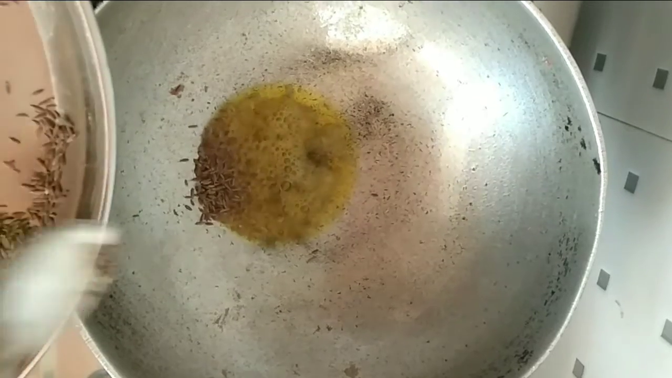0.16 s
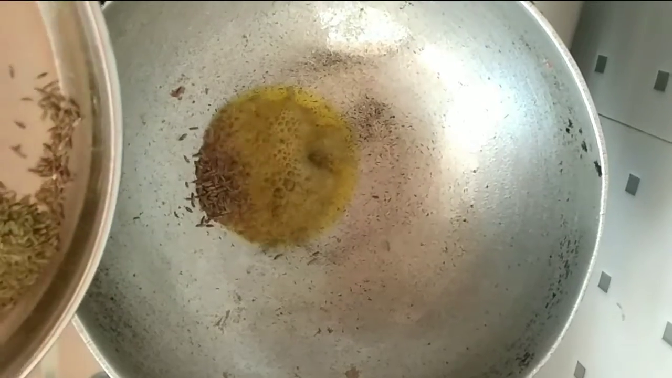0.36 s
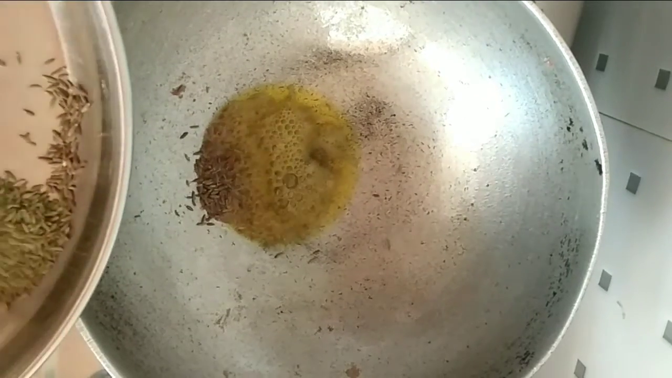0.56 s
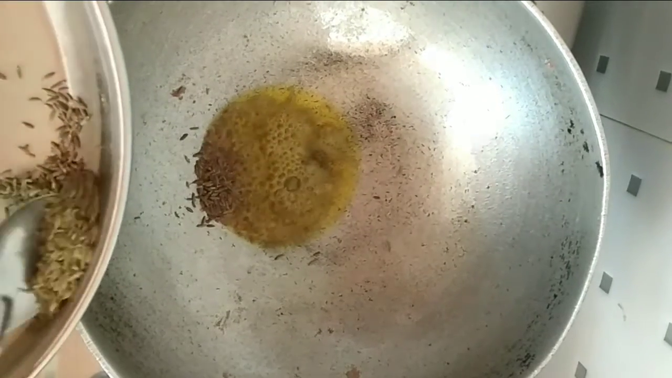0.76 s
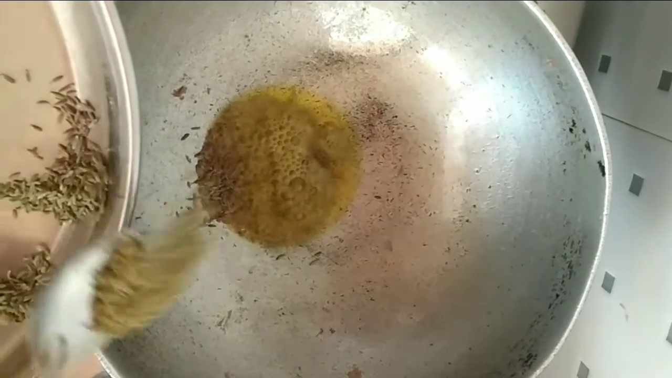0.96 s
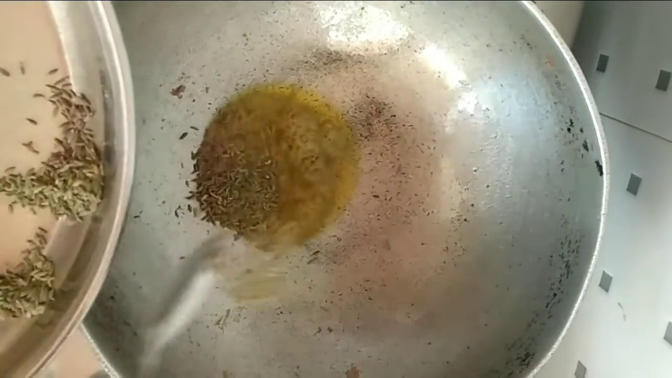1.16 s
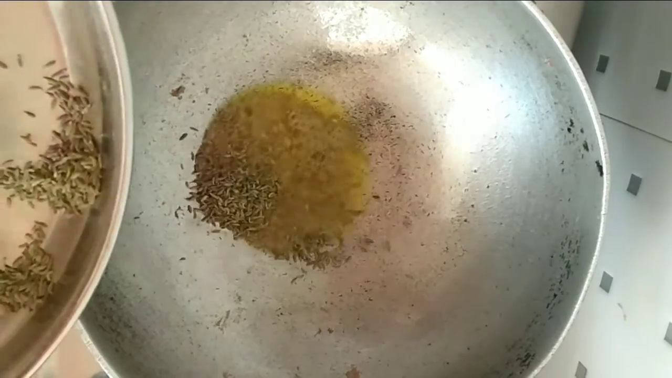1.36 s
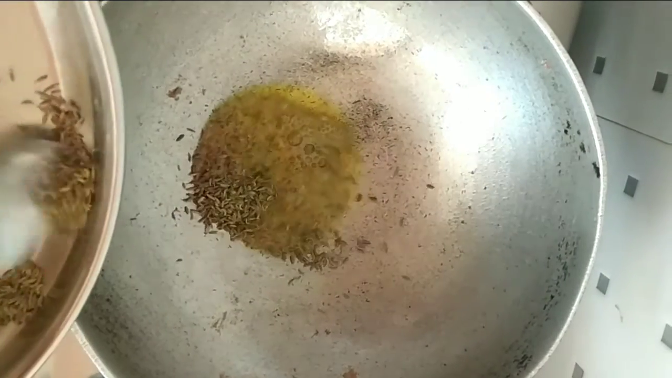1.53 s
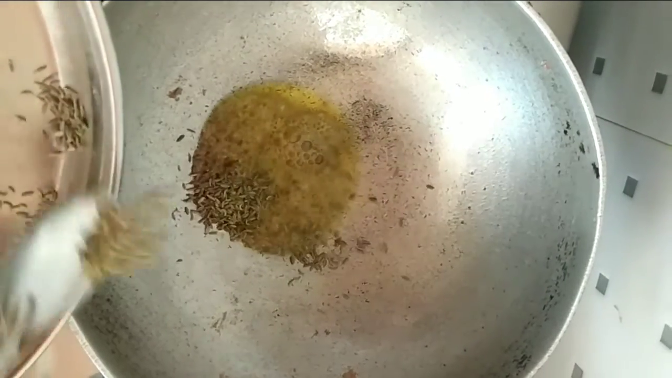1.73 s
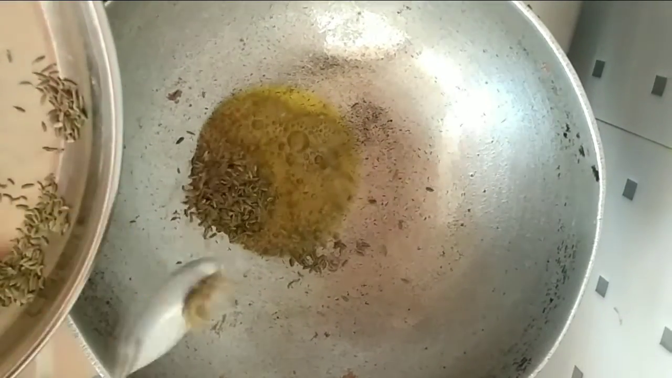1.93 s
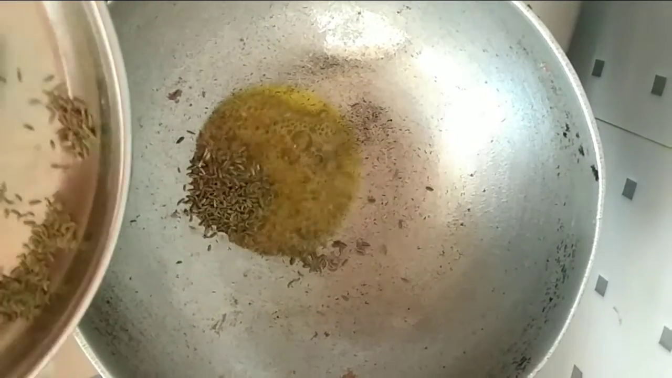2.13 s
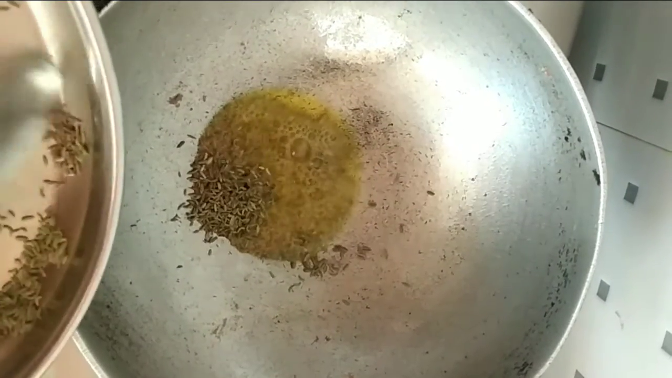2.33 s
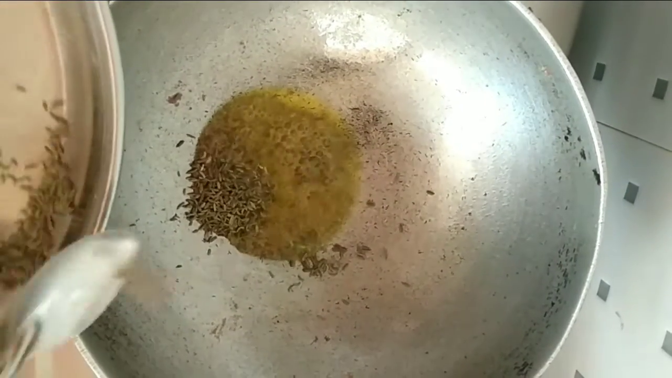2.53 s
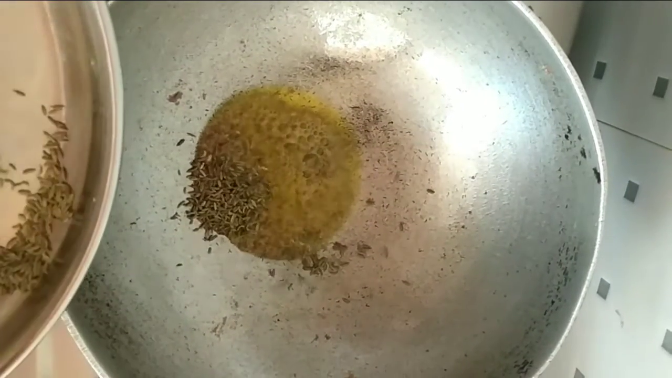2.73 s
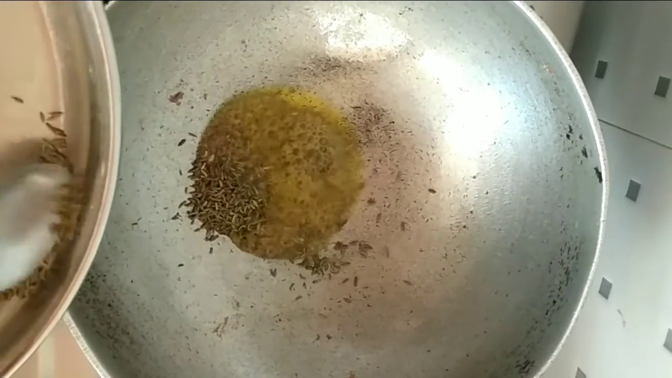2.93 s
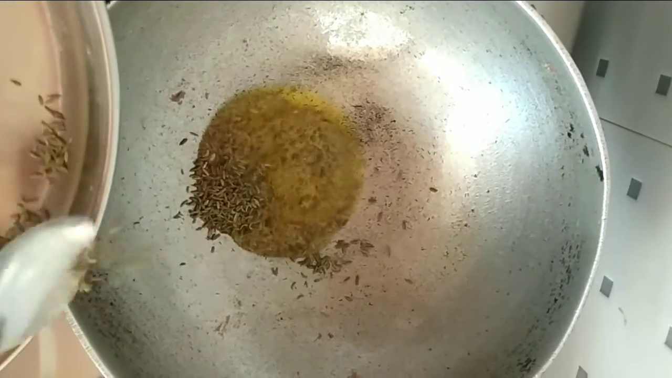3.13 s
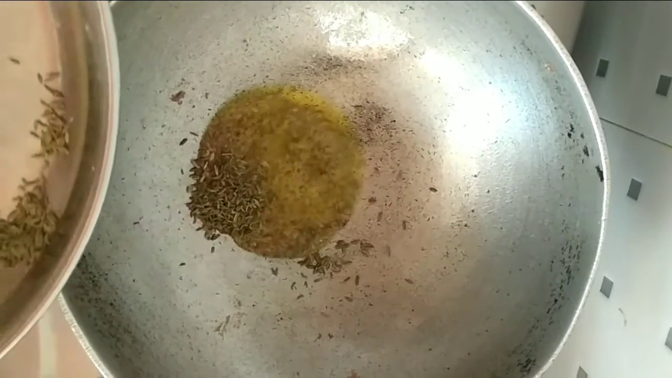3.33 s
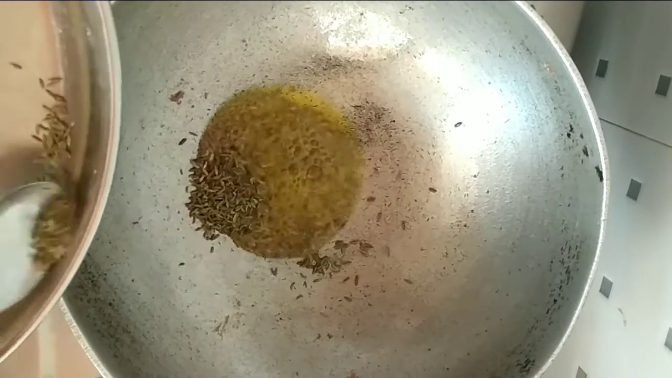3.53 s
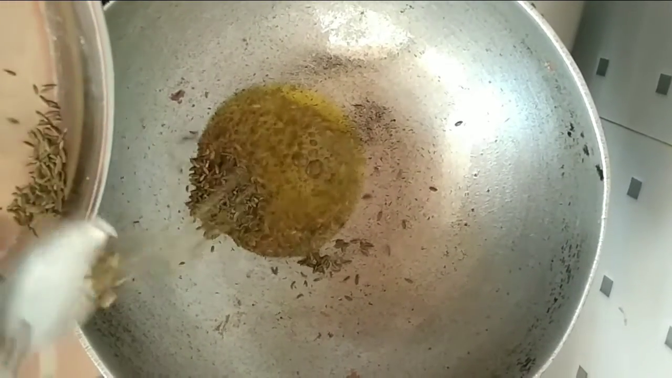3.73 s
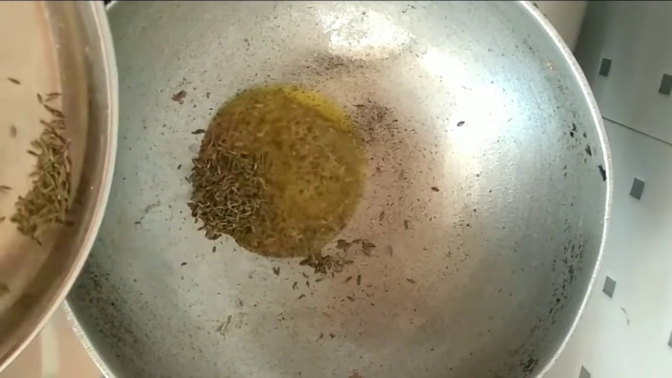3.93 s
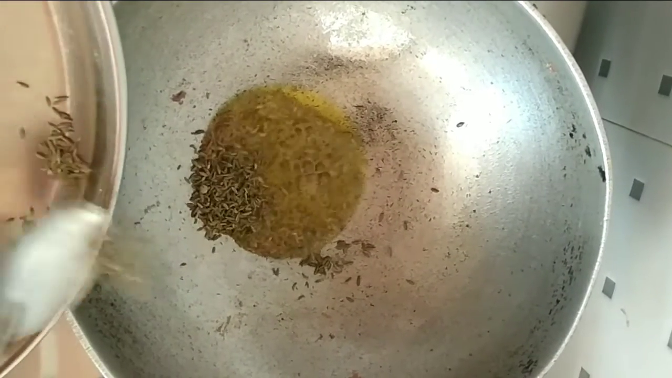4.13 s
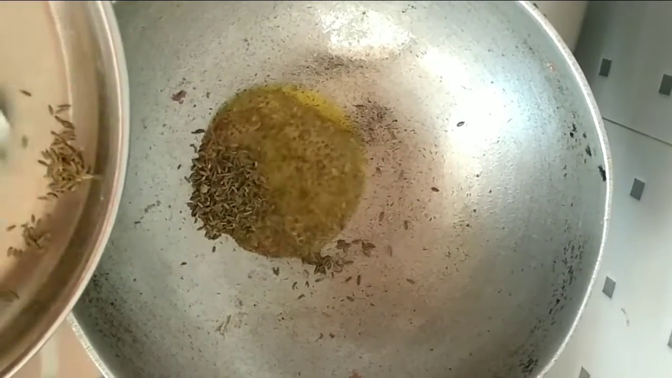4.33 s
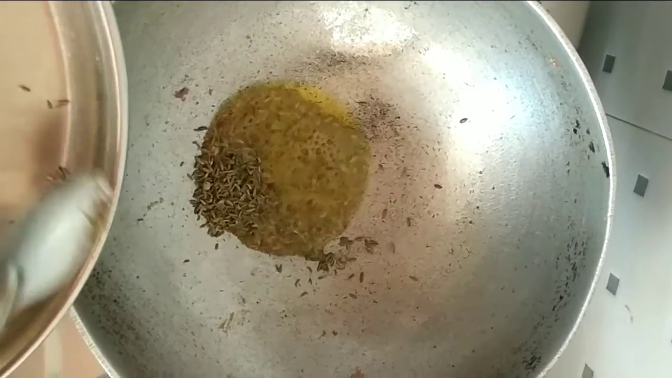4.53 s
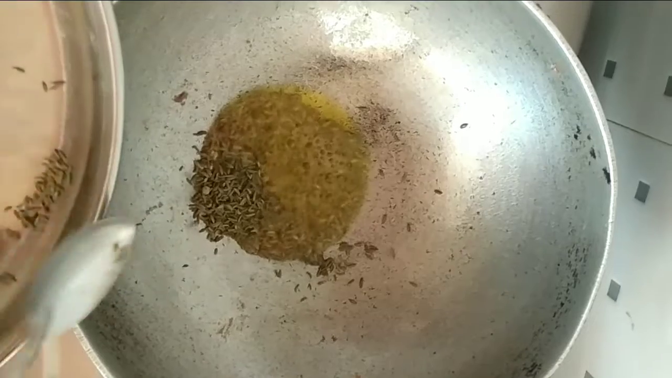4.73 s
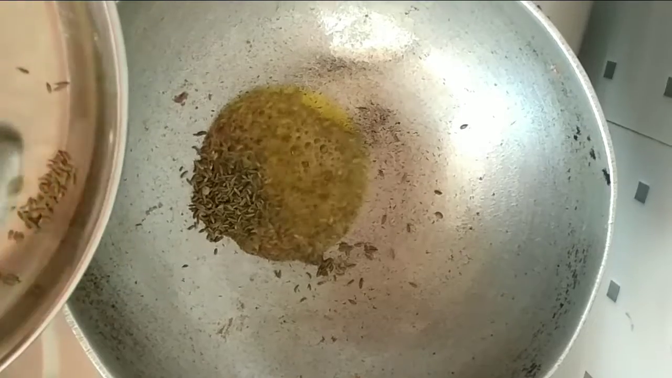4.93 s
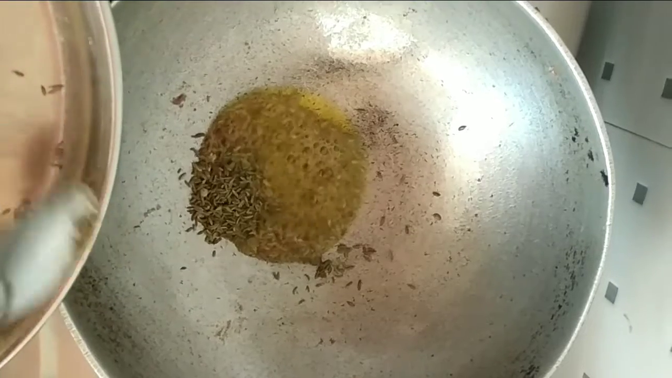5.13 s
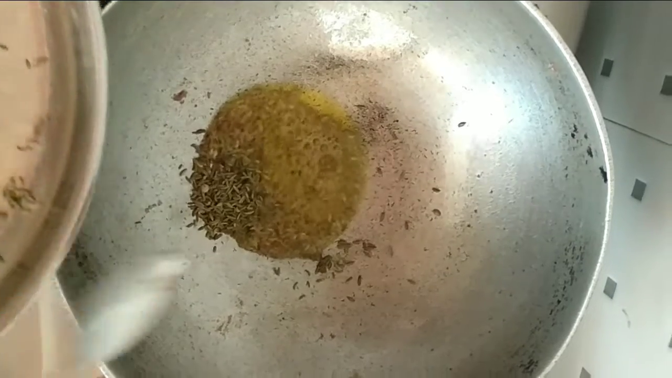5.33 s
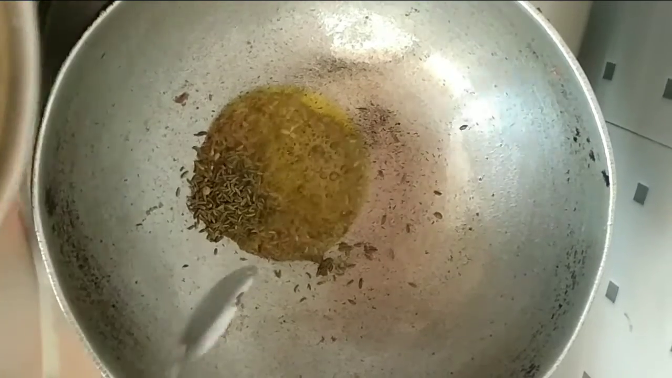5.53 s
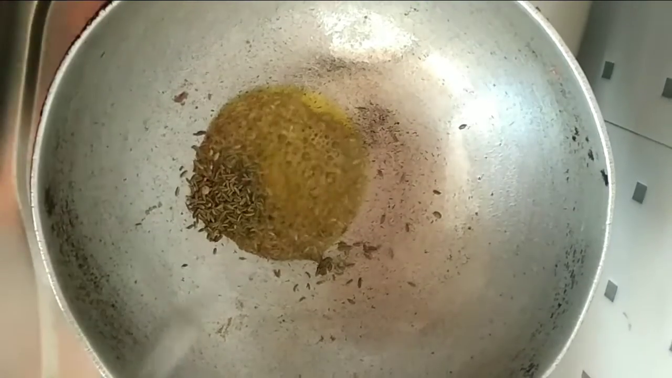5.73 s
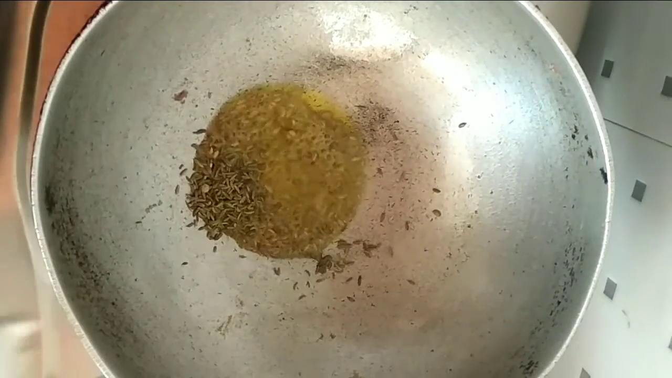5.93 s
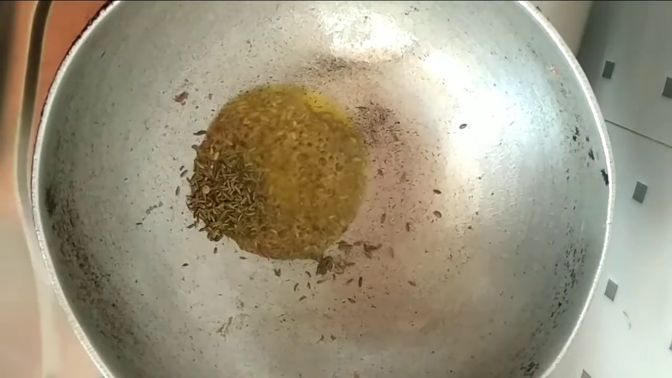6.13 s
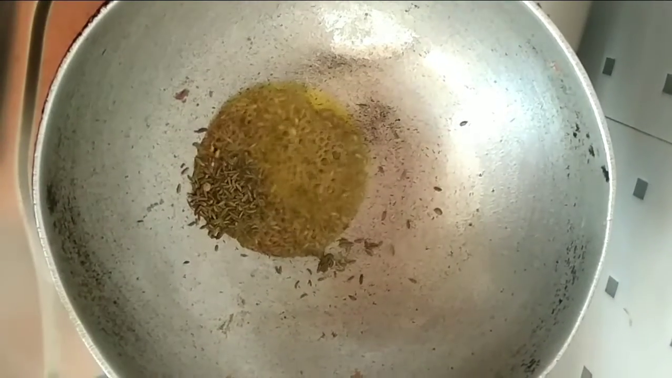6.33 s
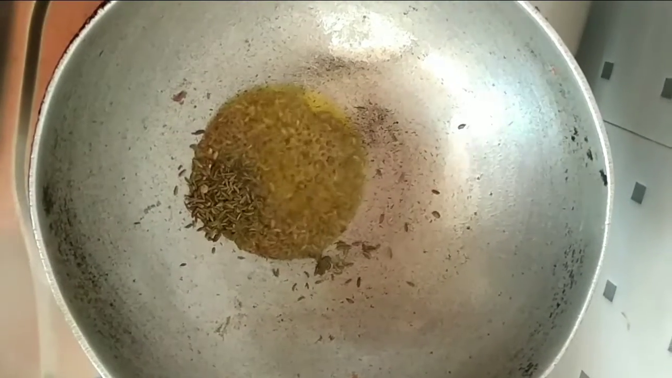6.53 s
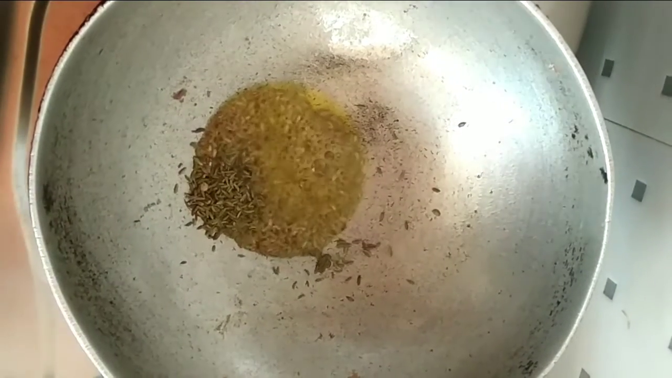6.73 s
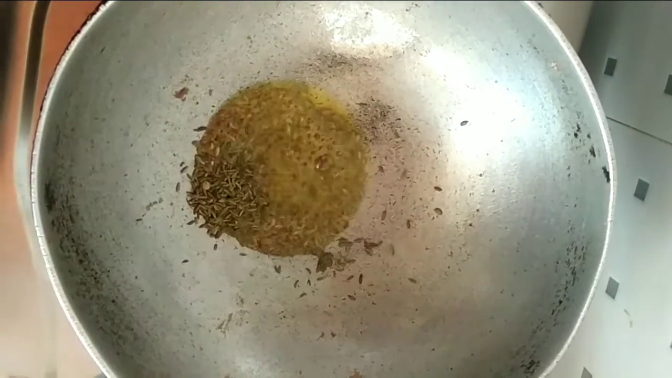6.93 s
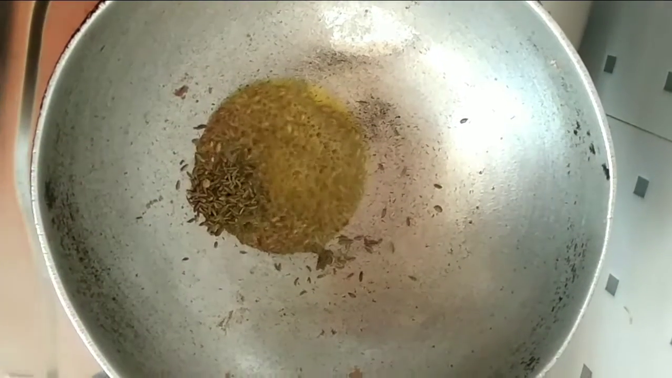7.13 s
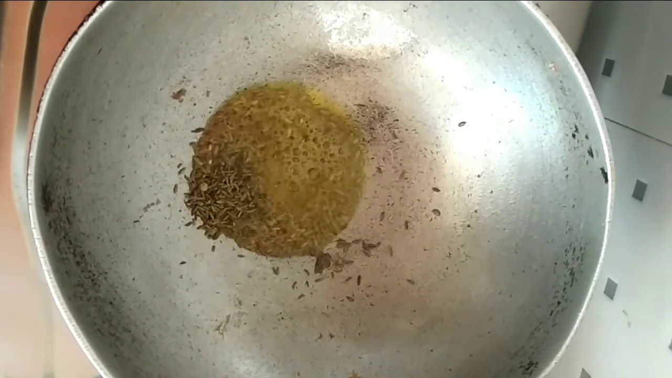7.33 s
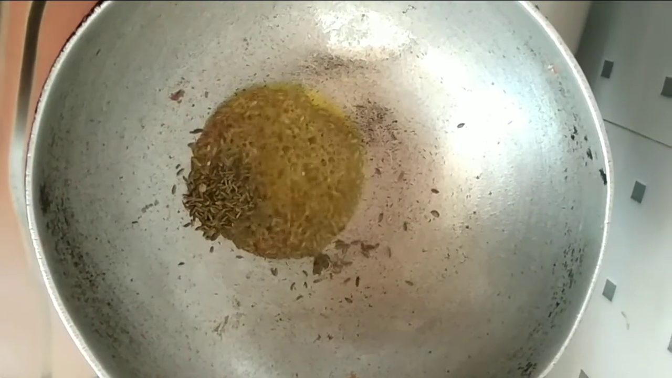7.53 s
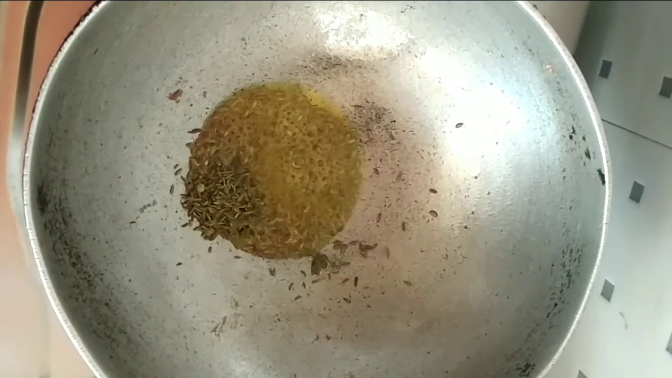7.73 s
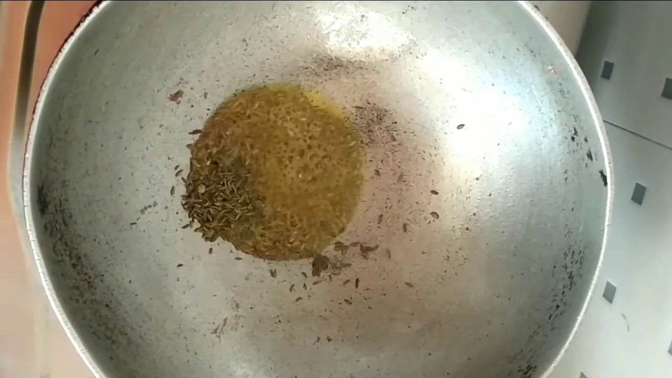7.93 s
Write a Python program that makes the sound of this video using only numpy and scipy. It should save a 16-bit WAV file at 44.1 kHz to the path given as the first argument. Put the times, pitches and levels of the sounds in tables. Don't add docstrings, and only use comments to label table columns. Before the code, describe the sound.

Seeds sizzle and pop in a little hot oil while a steel spoon scrapes and taps a metal plate, raining more seeds in.

```python
import sys
import numpy as np
from scipy import signal
from scipy.fft import rfft, irfft, next_fast_len
from scipy.io import wavfile
from scipy.ndimage import uniform_filter1d, map_coordinates

SR = 44100
rng = np.random.default_rng(int(sys.argv[2]) if len(sys.argv) > 2 else 0)


def volts_from_decibels(level):
    exponent = np.asarray(level, float) / 20
    return 10 ** exponent


def generate_wav(sig):
    pcm = np.round(np.clip(np.atleast_2d(sig).T, -1, 1) * 32767).astype(np.int16)
    wavfile.write(sys.argv[1], SR, pcm)


N = 355446
T = np.arange(N) / SR

# start_s, peak_db, push_pitch_hz, ringing_share_db, left_minus_right_db
THUMPS = [(0.357, -32.5, 724, 10.5, 6.5), (0.378, -29, 686, 2.5, 11), (0.43, -35.5, 520, 15, 7.5),
          (0.462, -33.5, 734, 1, 12.5), (0.475, -33, 650, 9, 7), (1.345, -33, 394, 9, 10),
          (2.117, -26.5, 970, 8, 11), (2.716, -35.5, 680, 11, 11), (3.164, -38.5, 106, -9.5, -31),
          (3.255, -23.5, 760, 6.5, 5.5), (3.364, -38, 748, 8.5, 8.5), (3.582, -25.5, 950, -25, -8.5),
          (3.85, -32.5, 800, 4.5, 9.5), (3.982, -45.5, 820, 11, -4), (4.242, -28, 700, -1.5, 13),
          (4.712, -23.5, 258, -9, -3.5), (4.776, -23.5, 645, -12, -2), (4.858, -28, 760, 4, 8),
          (5.771, -26.5, 670, -19, 4.0), (6.495, -46, 1190, 8.5, 4), (6.719, -38.5, 458, -10, 8),
          (6.738, -37, 497, 5.5, 13), (6.746, -26.5, 1070, -21, 10), (6.779, -39, 524, 3, 0),
          (0.367, -38, 1100, -12, -2), (0.411, -38, 800, 2, 7), (0.445, -33, 706, 5, 10),
          (1.353, -37, 900, -5, 12), (1.358, -38, 1000, -5, 6), (1.37, -36, 910, -6, 6)]
# pitch_hz, width_hz, level_db
PLATE = [(363, 19.5, -4.5), (457, 50, -7), (538, 19, -5.5), (645, 22, -5.5), (766, 20, 3),
         (865.5, 24, -0.5), (990, 130, -6), (1125, 53, -2), (1316, 29, -4.5), (1930, 200, -8),
         (2225, 190, -7.5)]


def level(x, db):
    return x * volts_from_decibels(db) / np.sqrt(np.mean(x ** 2))


def colour(x, points):
    size = next_fast_len(x.shape[-1], True)
    hz, db = np.transpose(points)
    f = np.arange(size // 2 + 1) * SR / size
    gain = volts_from_decibels(np.interp(np.log(f + 1), np.log(hz), db, left=-90, right=-90))
    return irfft(rfft(x, size) * gain, size)[..., :x.shape[-1]]


def ring(x, modes):
    size = next_fast_len(x.shape[-1], True)
    f = np.arange(size // 2 + 1) * SR / size
    body = 0
    for k, (hz, width_hz, db) in enumerate(modes):
        tone = volts_from_decibels(db) * width_hz * f / (hz ** 2 - f ** 2 + 1j * width_hz * f)
        body = body + (-1) ** k * tone
    return irfft(rfft(x, size) * body, size)[..., :x.shape[-1]]


def walk(rate):
    k = int(SR / rate)
    held = np.repeat(rng.standard_normal(N // k + 1), k)
    return 1.31 * uniform_filter1d(held, k)[:N]


def grains(share, spread_db, common):
    happens = rng.random(N) < share
    size = happens * volts_from_decibels(spread_db * np.minimum(rng.exponential(size=N), 4))
    size = uniform_filter1d(size, size=9)
    alike = rng.standard_normal(N)
    unlike = rng.standard_normal((2, N))
    return size * (common * alike + (1 - common) * unlike)


def sides(pan_db):
    return volts_from_decibels(np.array([[pan_db], [-pan_db]]) / 2)


def swells(rows):
    t = T[::32]
    curves = []
    for s, rise, top, hold, end, fall in rows:
        corners_s = np.cumsum([s - 2 * rise, 2 * rise, hold + 1e-4, 2 * fall])
        corners_db = [top - 40, top, end, end - 40]
        curves.append(np.interp(t, corners_s, corners_db, left=-99, right=-99))
    return volts_from_decibels(np.interp(T, t, np.max(curves, axis=0)))


def patchy(x, patchy_db, size=2):
    f, t, z = signal.stft(x, nperseg=1024)
    coarse = rng.standard_normal((len(f) // size + 2, len(t) // 6 + 2))
    places = np.meshgrid(np.arange(len(f)) / size, np.arange(len(t)) / 6, indexing="ij")
    field = map_coordinates(coarse, places, order=1)
    return signal.istft(z * volts_from_decibels(patchy_db * np.minimum(field, 0.8)), nperseg=1024)[1][:, :N]


def kitchen():
    # pitch_hz, level_db
    rumble = [(18, 2.5), (24, 0.5), (32, -5), (41, -8), (50, 3), (62, -6.5), (80, -12), (100, -2.5),
              (160, -14.5), (300, -23.5), (600, -27.5), (1200, -40), (2500, -47)]
    # time_s, level_db
    busy = [(0, -0.5), (1, -1), (2, -0.5), (3, 1), (4, 1), (5, 3.5), (5.6, -1.5), (7, 0), (8.1, -3.5)]
    noise = rng.standard_normal((3, N))
    swell_db = np.interp(T, *np.transpose(busy)) + 1.2 * walk(2.1)
    return level(colour(noise[0] + 0.36 * noise[1:], rumble), -68.5) * volts_from_decibels(swell_db)


def echo(x, t60_s, low_hz, top_hz, db):
    t = T[:20000]
    fade = np.exp(-np.log(1000) * t / t60_s) * np.clip(t / 0.00048, 0, 1)
    tail = rng.standard_normal((2, len(t))) * fade
    tail = signal.sosfilt(signal.butter(1, [low_hz, top_hz], "band", fs=SR, output="sos"), tail)
    tail = tail * volts_from_decibels(db) / np.sqrt(np.sum(tail ** 2) / 2)
    return signal.fftconvolve(x, tail, axes=1)[:, :N]


def oil():
    # pitch_hz, level_db
    sizzle = [(900, -27.5), (1650, -24), (2200, -13.5), (3200, -5.5), (4500, -10.5), (7000, -2.5),
              (9000, -5.5), (12000, -2.5), (15000, -4), (16500, 0)]
    fizz = colour(grains(share=0.15, spread_db=-2.0, common=0.051), sizzle)
    unsteady_db = 0.19 * walk(3.8) + 0.2 * walk(25)
    return level(fizz * volts_from_decibels(unsteady_db), -51) * sides(0.99)


def metal_hums():
    # start_s, length_s, pitch_hz, level_db
    afterrings = [(3.167, 0.14, 98, -51), (4.71, 0.084, 120, -52), (5.545, 0.066, 235, -63),
                  (6.857, 0.09, 533, -56.5), (6.966, 0.054, 525, -63)]
    total = np.zeros(N)
    for s, length, hz, db in afterrings:
        arch = np.sin(np.pi * np.clip((T - s) / length, 0, 1)) ** 0.5
        total += volts_from_decibels(db) * np.sin(2 * np.pi * hz * T + 1.1 * walk(45)) * arch
    return volts_from_decibels(3.2 * walk(40)) * total


def thumps():
    out, t = np.zeros((2, N + 8192)), T[:8192]
    for s, db, hz, ring_db, pan_db in THUMPS:
        hump = np.sin(np.pi * np.clip(t * max(hz, 330) * 1.055, 0, 1)) ** 2
        push = signal.sosfilt(signal.butter(2, 0.75 * hz, "high", fs=SR, output="sos"), hump)
        chance = rng.standard_normal((len(PLATE), 3))
        grip = np.array(PLATE, float)
        grip[:, 0] *= 1 + 0.008 * chance[:, 0]
        grip[:, 1] *= 1.6 * volts_from_decibels(1.5 * chance[:, 1])
        grip[:, 2] += 2.06 * chance[:, 2]
        blow = push + volts_from_decibels(ring_db + 4) * ring(push, grip)
        i = int(s * SR)
        out[:, i:i + 8192] += blow * volts_from_decibels(db + 3.0) * sides(pan_db)
    return out[:, :N]


def drumming_plate():
    # start_s, level_db, fall_20db_s
    drumming = [(0.361, -45.5, 0.07), (0.4, -43, 0.32), (1.353, -45, 0.1657), (2.131, -46.5, 0.17),
                (2.731, -44, 0.17), (3.115, -62.5, 2), (3.271, -41, 0.11), (3.6, -59, -1.1),
                (3.859, -48.5, 0.18), (4.248, -47.5, 0.31), (4.72, -53.5, 0.32), (4.781, -48, 0.1364),
                (4.885, -42, 0.07), (5.781, -63.5, 0.56), (6.511, -74, 1.7), (6.74, -42.5, 0.06),
                (6.914, -69, 0.1)]
    rise_s = 0.035
    loudness = swells([(s, rise_s, db, 0, db, fall) for s, db, fall in drumming])
    plate = ring(grains(share=0.01, spread_db=3.0, common=0.54), PLATE)
    return level(plate, -2.85) * loudness * sides(3.4)


def cracks(rows, pan_db, chatter, modes):
    # pitch_hz, level_db
    crack_tone = [(600, -28), (1500, -11), (3000, -9.5), (6000, 0), (10000, 0.5), (14000, 3), (16000, 3)]
    band_hz, band_db = np.transpose(crack_tone)
    lead = 256
    out, t = np.zeros((2, N + 8192)), T[:8192]
    knock_hz, knock_s, knock_db = 1160, 0.0006, -16.5
    knock = np.sin(2 * np.pi * knock_hz * t) * np.exp(-t / knock_s)
    knock = signal.sosfilt(signal.butter(2, 480, "high", fs=SR, output="sos"), knock)
    knock = volts_from_decibels(knock_db) * np.roll(knock, lead)
    for s, db, hz, body_db, spatter_db in rows:
        noise = rng.standard_normal((3, 8192))
        shape = np.exp(-t / 0.0007) + 0.46 * np.exp(-t / 0.0037)
        shape = shape + chatter * np.exp(-(t / 0.0055) ** 4)
        shape = shape + volts_from_decibels(spatter_db + 2.5) * np.exp(-t / 0.0085)
        burst = (0.47 * noise[0] + noise[1:]) * shape * np.clip(t / 0.0005, 0, 1)
        burst[:, 24] += 3.0
        lift_db = 7 * np.exp(-0.5 * (np.log(band_hz / hz) / 0.54) ** 2)
        tilt_db = 0.81 * (body_db + 27.5) * (band_hz < 3500)
        burst = colour(np.roll(burst, lead, axis=1), np.c_[band_hz, band_db + lift_db + tilt_db])
        own = [(hz, 0.12 * hz, 3)]
        burst = burst + ring(burst, own + modes)
        lone = not any(0 < s - row[0] < 0.015 for row in THUMPS)
        knock_gain = volts_from_decibels(-18.5 if lone else 0)
        i = int(s * SR) - lead
        sound = burst / np.abs(burst).max() + knock * knock_gain
        out[:, i:i + 8192] += sound * volts_from_decibels(db + 4.0) * sides(pan_db)
    return out[:, :N]


def seed_pops():
    # start_s, peak_db, colour_hz, body_under_3khz_db, spatter_after_db
    bursting = [(0.0548, -29.5, 11500, -72, -9), (1.2513, -24, 6500, -39, -32),
                (2.284, -53, 12300, -23.5, -6), (2.7323, -24.5, 11500, -9, -33),
                (3.1088, -11.5, 7500, -14, -19.5), (3.1727, -11, 13500, -17.5, -43),
                (3.2355, -22, 15000, -29, -42), (3.3897, -21, 13600, -8.5, -24),
                (3.5595, -16, 4760, -11.5, -23), (3.6496, -15, 4870, -25.5, -13.5),
                (3.8157, -14.5, 6000, -14.5, -11.5), (4.4665, -29.5, 2470, -2, -21),
                (4.1989, -29, 6230, -12, -3), (4.2514, -10.5, 11700, -20, -42),
                (4.561, -34, 14700, -12, 13), (4.69, -20, 6700, -15, -32), (4.7837, -10.5, 5850, -16, 13),
                (5.3183, -23, 7100, -30, -10), (5.7129, -25, 6440, -11.5, -9),
                (5.7245, -20.5, 7000, -22, -15), (5.907, -14.5, 14800, -20.5, -4),
                (6.5014, -24, 2260, -9, -16), (6.6182, -27, 14300, -19, 4),
                (6.6702, -31.5, 14800, -27.5, -20)]
    return cracks(bursting, 1, 0.03, [])


def more_seed_pops():
    # start_s, peak_db, colour_hz, body_under_3khz_db, spatter_after_db
    more_bursting = [(0.7299, -38, 2410, -14, -15), (0.7378, -37, 2370, -12, -15), (1.5759, -31, 3100, -25, -25),
                     (2.3287, -30, 4700, -17, -20), (2.1, -37, 5980, -15, -25), (3.9655, -24, 2640, -10, -20),
                     (4.8, -28.5, 10000, -12.5, -28), (3.4, -26, 9600, -22, -20), (3.828, -28, 7600, -20, -25),
                     (6.957, -36.5, 2200, -9, -16), (4.7895, -16, 5000, -24, -27), (4.796, -19, 6300, -22, -25),
                     (4.8, -27.5, 6800, -20, -20), (5.7845, -13.5, 9000, -23, -15), (5.912, -22, 9800, -23, -13)]
    return cracks(more_bursting, 1, 0.04, [])


def spoon_taps():
    # start_s, peak_db, colour_hz, body_under_3khz_db, spatter_after_db
    taps = [(0.3682, -29, 11500, -10, -19), (2.0637, -30.5, 10300, -51, -6),
            (2.1233, -14.5, 13900, -8.5, -30), (2.421, -20, 12300, -24, 10),
            (3.262, -13, 12300, -13.5, -42), (3.462, -21, 3950, -12.5, 10), (3.5912, -10, 9500, -23, -22),
            (3.8581, -16.5, 12200, -12, -7), (3.993, -13.5, 11500, -14, -24.5),
            (4.4454, -31, 11400, -3, 24), (4.7216, -10, 12000, -12.5, -9), (4.868, -14, 12000, -8.5, -28),
            (5.1778, -26, 7150, -7, 3), (5.6148, -26.5, 11100, -39, -4), (5.7798, -10, 10600, -22, -4),
            (6.0727, -32.5, 11400, -33, -2), (6.7481, -30, 13900, -26, -5), (6.9491, -35, 11700, -10, 2)]
    # pitch_hz, width_hz, level_db
    bowl = [(2200, 330, 1), (2580, 480, -5.5)]
    return cracks(taps, 4, 0.2, bowl)


def rattling_seeds():
    # start_s, level_db, fall_20db_s, low_against_high_db
    slides = [(0.375, -47, 0, -6.5), (1.574, -37, 0.18, -2.5), (2.125, -56, 4.5, -5),
              (2.425, -32.5, 0.0646, 3), (2.662, -46, 0.14, -19.5), (2.74, -41.5, 0.17, -2.5),
              (3.161, -48, 4, -13), (3.267, -41.5, 0.3, -17), (3.471, -35.5, 0.17, 2.5),
              (4.25, -38, 0.23, 2), (4.871, -43.5, 0.04, -5), (6.952, -47.5, 0.38, 0)]
    # peak_s, level_db, fall_20db_s, low_against_high_db, rise_20db_s
    showers = [(0.02, -50.5, 0.7, -19, -0.7), (0.531, -45, 1.7, -7.5, 0.4), (0.75, -36.5, 0.1, 9, 0.07),
               (0.794, -31, 0.05, -2.5, 0.1147), (1.02, -39.5, 0.2, 2.5, 0.22),
               (1.185, -45, 0.34, -16.5, 1.4), (1.5, -45, 0.2, -12, 0.35), (1.622, -33.5, 0.09, -5, 0.08),
               (1.828, -44.5, 0.24, -3, 0.2), (2.035, -36, -2.2, -15.5, 0.25), (2.37, -41, 0.27, -4, 0.33),
               (3.394, -45, -2.7, -6, 2), (3.62, -45.5, 0.8, -3, 0.45), (3.941, -37.5, 0.2, 7, 0.14),
               (4.015, -31, 0.08, -8, 0.2), (4.426, -38.5, 0.22, 1, 0.06), (4.568, -50.5, -2, -1, 12),
               (4.755, -41.5, -0.65, -23, 3), (4.97, -38.5, 0.2, 7.5, 0.5), (5.049, -34.5, 0.04, -7, 0.24),
               (5.236, -49.5, 0.8, 3, 0.5), (5.839, -54, 2.5, -6, 2), (6.633, -50, 1.15, -4, 0.7)]
    # pitch_hz, level_db
    seed_tone = [(710, -63), (1200, -25.5), (1850, -16), (2350, -6.5), (3660, -7.5), (4310, -11.5),
                 (6030, -2.5), (7570, -2), (11800, -1.5), (14800, -1.5), (16000, -18)]
    slide_rise_s = 0.054
    falls = sorted([(*row, slide_rise_s) for row in slides] + [tuple(row) for row in showers])
    loudness = swells([(s, rise, db, 0, db, fall) for s, db, fall, _, rise in falls])
    seeds = colour(grains(share=0.3, spread_db=0.5, common=0.14), seed_tone)
    low = signal.sosfiltfilt(signal.butter(2, 4200, fs=SR, output="sos"), seeds)
    start_s, _, _, low_db, _ = np.transpose(falls)
    heavy_db = 0.33 * (np.interp(T, start_s, low_db) + 8.0)
    seeds = low * volts_from_decibels(heavy_db) + (seeds - low) * volts_from_decibels(-heavy_db)
    return level(seeds, 1.3) * volts_from_decibels(1.4 * walk(54)) * loudness * sides(3.24)


def rubbed_steel():
    # start_s, length_s, start_db, end_db, lift_off_20db_s
    strokes = [(0.371, 0.002, -33, -33, 0.018), (0.427, 0.002, -36, -36, 0.026),
               (0.541, 0.149, -38.5, -49.5, 0.012), (1.425, 0.11, -33, -32.5, 0.03),
               (2.131, 0.002, -37, -37, 0.048), (2.165, 0.06, -51, -39, 0.032),
               (2.289, 0.034, -44, -49, 0.012), (2.734, 0.094, -37, -32, 0.04),
               (3.29, 0.09, -36, -46, 0.012), (3.871, 0.046, -36, -33, 0.12),
               (4.26, 0.12, -31.5, -33, 0.035), (4.877, 0.086, -31, -37, 0.05),
               (6.956, 0.002, -34, -34, 0.041)]
    # start_s, level_db, fall_20db_s
    catches = [(1.432, -28, 0.04), (1.478, -25.5, 0.03), (1.488, -29, -0.01), (1.515, -23.5, 0),
               (1.533, -29, -0.03), (2.736, -30.5, 0.015), (2.797, -28, 0.02), (2.818, -28, 0),
               (2.848, -40.5, 0.05), (3.862, -25, -0.07), (3.92, -26.5, -0.03), (3.997, -30.5, -0.13),
               (4.278, -31, 0.01), (4.327, -31, 0.03), (4.365, -30, 0.07), (4.873, -28.5, 0.0864),
               (4.89, -31, 0.09), (4.925, -30, 0.05), (4.957, -36, 0.04), (5.049, -42.5, 0.22)]
    # pitch_hz, width_hz, level_db
    steel_tones = [(5200, 97, -19), (7130, 100, -13), (7840, 64, -21), (8980, 130, -9), (9890, 80, -10),
                   (10400, 44, -16), (10800, 150, -21), (11400, 47, -3), (11900, 140, -2), (13200, 110, -1),
                   (14100, 93, 0), (14300, 37, -6), (14500, 16, -4), (14700, 160, -3)]
    stroke_rise_s, catch_rise_s = 0.02, 0.012
    loudness = swells([(s, stroke_rise_s, db, length, end_db, fall) for s, length, db, end_db, fall in strokes]
                      + [(s, catch_rise_s, db, 0, db, fall) for s, db, fall in catches])
    judder = volts_from_decibels(0.8 * walk(110))
    crowd = [(13100, 3300, -18.0), (9500, 440, -28.0)]
    steel = ring(grains(share=0.17, spread_db=2.0, common=0.048) * judder, steel_tones + crowd)
    bend = np.cumsum(1 + 0.0062 * walk(14))
    steel = np.array([np.interp(bend, np.arange(N), side) for side in steel])
    steel = patchy(steel, patchy_db=5.5, size=12)
    return level(steel, 1.0) * loudness * sides(8.4)


def spoon():
    hz, width_hz, db = 8290, 250, -12.5
    dip = [(100, 0), (hz - width_hz, 0), (hz, db), (hz + width_hz, 0), (20000, 0)]
    return colour(rubbed_steel() + rattling_seeds(), dip) + drumming_plate()


def scene():
    struck = spoon_taps() + seed_pops() + more_seed_pops() + thumps() + metal_hums()
    room = echo(struck, t60_s=0.35, low_hz=543, top_hz=5800, db=-9.5)
    fizz = oil()
    near = struck + patchy(room + spoon() + 0.74 * fizz, patchy_db=8.0) + 0.44 * fizz
    left = np.roll(near[0], 4)
    return np.array([left, near[1]]) + kitchen()


def low_pass(x):
    return signal.sosfilt(signal.butter(12, 16660, fs=SR, output="sos"), x)


def record(dry):
    top = signal.ellip(10, 0.2, 40, 15600, fs=SR, output="sos")
    return low_pass(signal.sosfilt(top, dry))


dry = scene()
out = record(dry)
generate_wav(out)
```